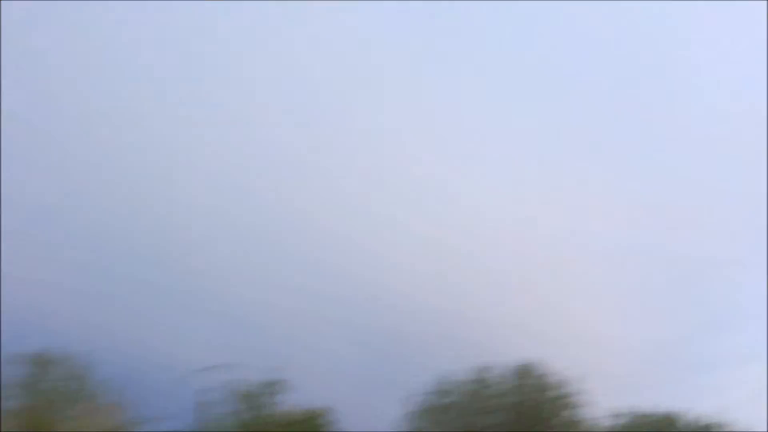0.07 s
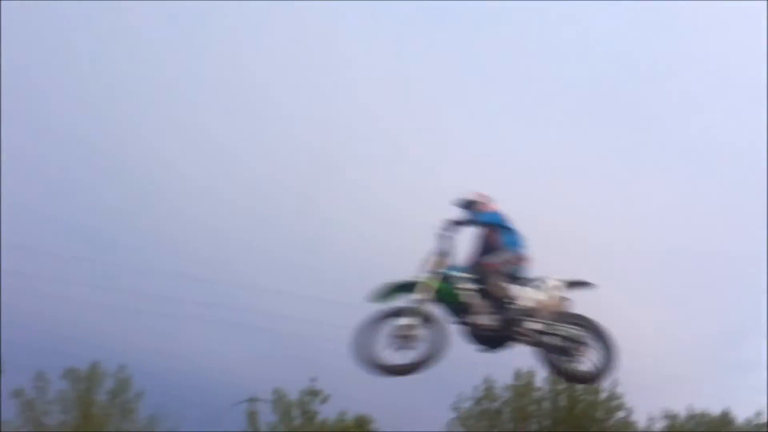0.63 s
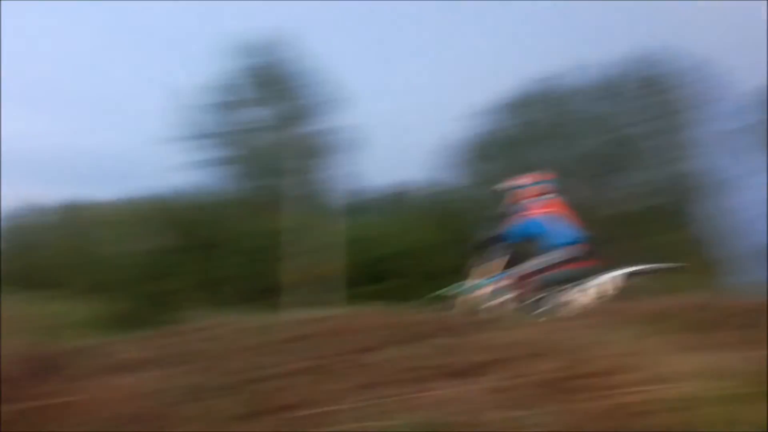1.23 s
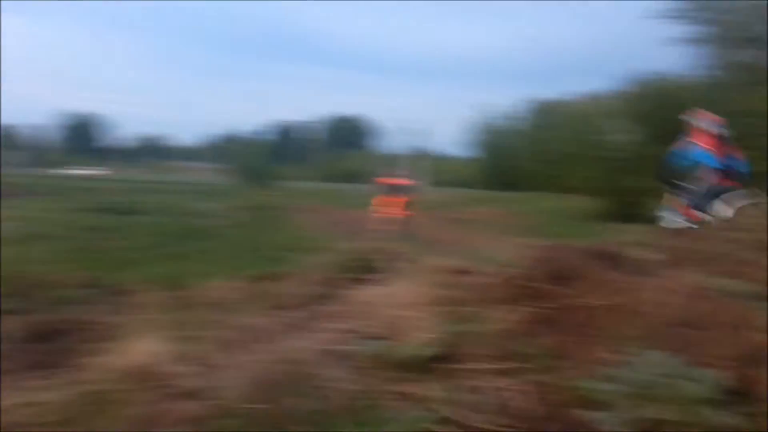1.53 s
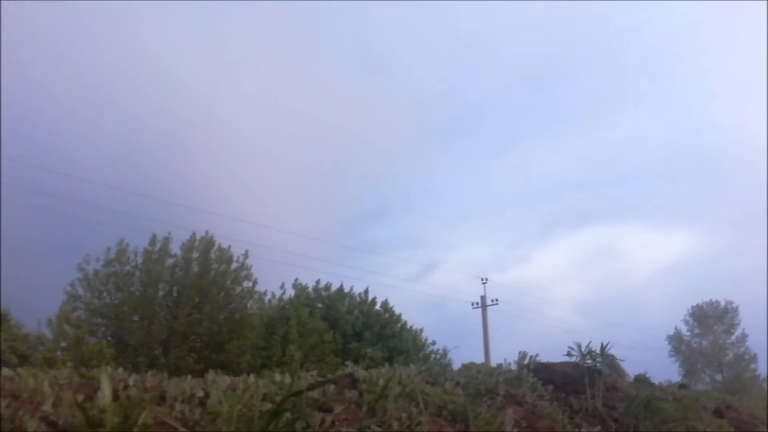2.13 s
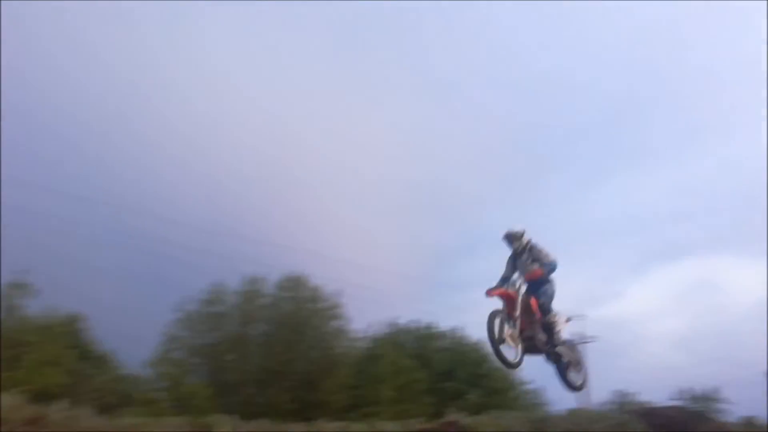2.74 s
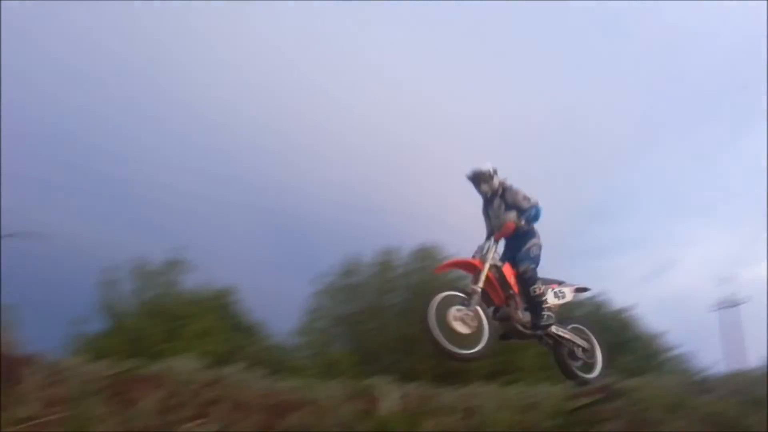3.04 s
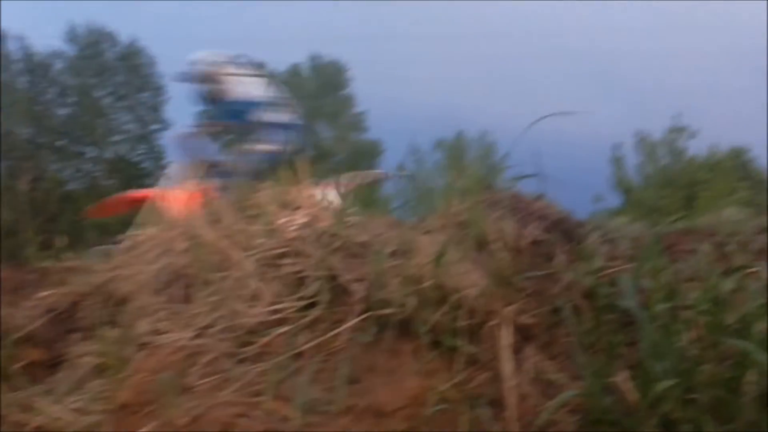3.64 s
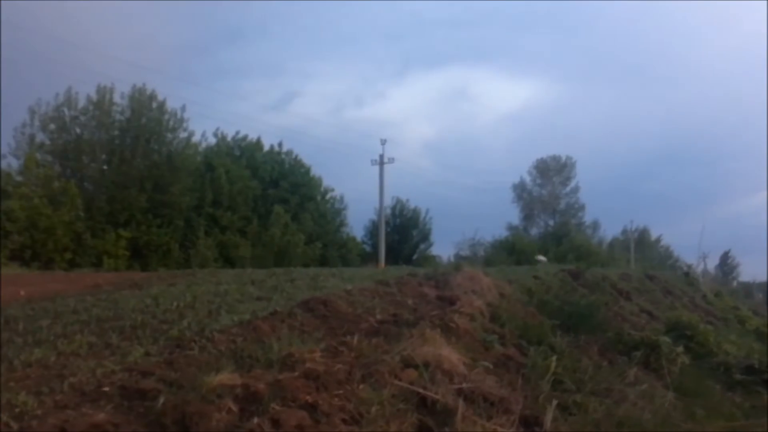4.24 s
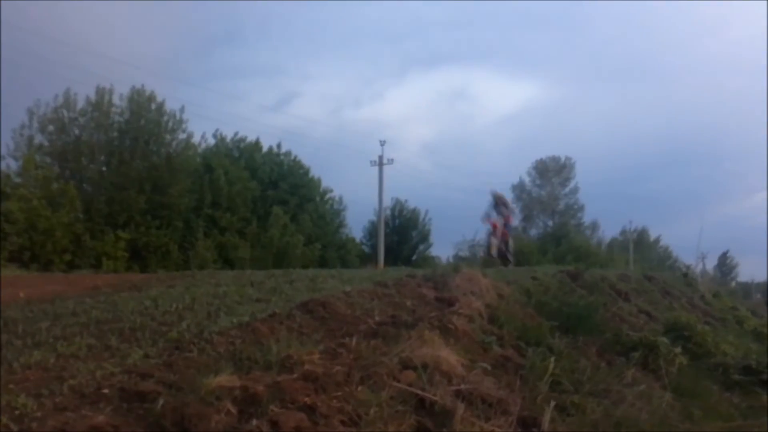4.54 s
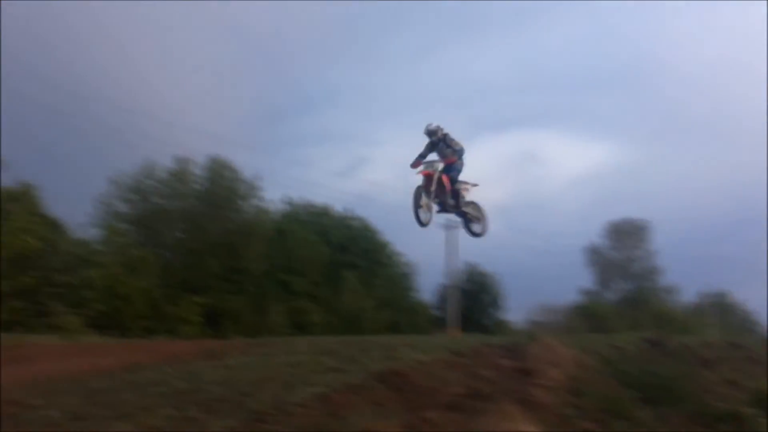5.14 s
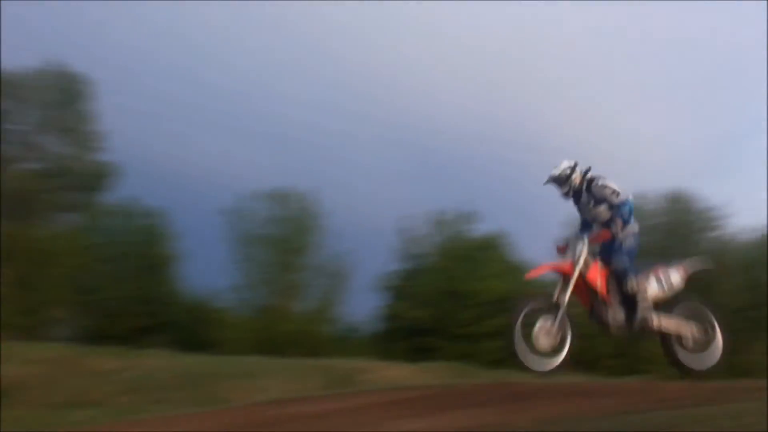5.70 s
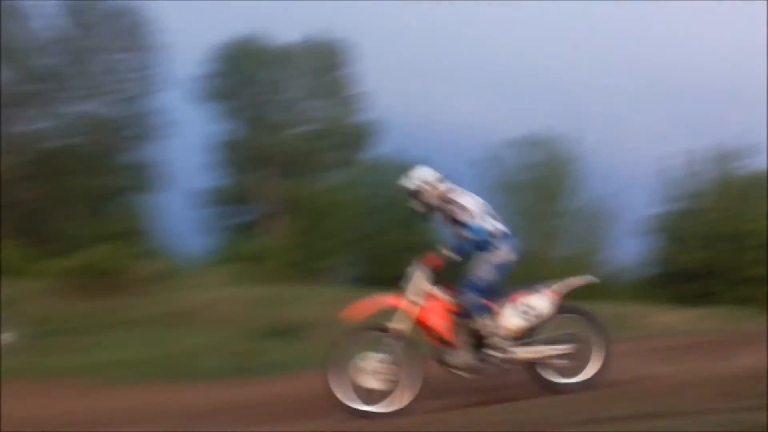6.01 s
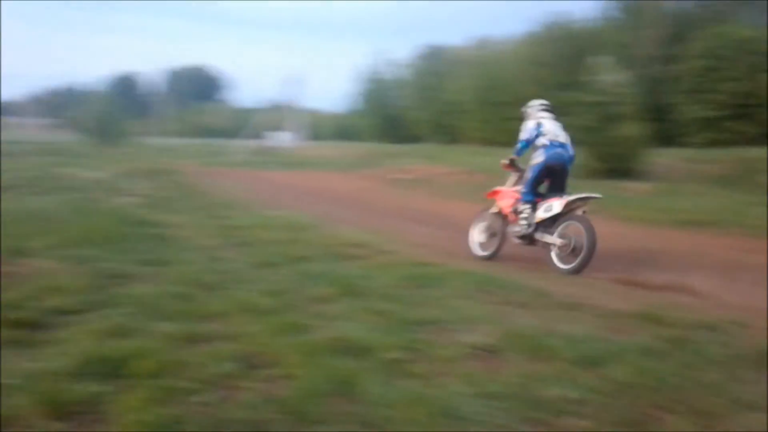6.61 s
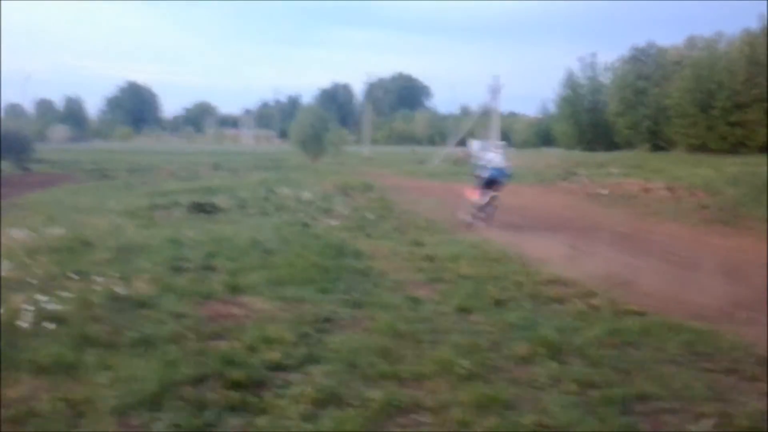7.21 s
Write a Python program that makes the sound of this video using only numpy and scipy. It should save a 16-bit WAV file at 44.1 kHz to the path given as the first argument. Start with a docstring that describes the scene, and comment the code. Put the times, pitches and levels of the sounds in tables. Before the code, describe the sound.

Four-stroke dirt bikes pass close to a stereo microphone outdoors, putting off the throttle and roaring with a rasp on it, over a light wind rumble. The first is close almost at once and fires a loud volley of exhaust bangs from about 0.7 to 1.2 seconds. It recedes, with one hard, bright clack near 1.6 seconds. At 1.9 seconds the sound cuts to a second bike, which putts nearer, revs loudly around 3 seconds, bangs at about 3.2 and 3.5 seconds and leaves to the left. Just after 4.1 seconds it cuts to a third bike. This one builds to a close roar at the highest revs between 5 and 5.7 seconds, then drops in pitch and bangs near 5.9 seconds. It pops several times around 6.5 seconds and fades, with faint last pops at about 7.3 seconds.

```python
"""Three four-stroke dirt bikes take a jump in turn, close to a stereo microphone; light wind rumbles.
Each firing thumps, booms in the pipe and rasps: separate putts off the throttle, a roar on it.
The first bike passes with a volley of exhaust bangs and recedes; one hard clack at 1.56 s.
At 1.9 s the sound cuts to the second, which nears, revs, bangs and leaves to the left.
At 4.15 s it cuts to the third, which roars past at the highest revs and fades, popping."""
import sys
import numpy as np
from scipy import signal
from scipy.fft import rfft, irfft
from scipy.io import wavfile
from scipy.ndimage import uniform_filter1d, map_coordinates

SR = 44100
rng = np.random.default_rng(int(sys.argv[2]) if len(sys.argv) > 2 else 0)


def file_out(sig):
    """Save sig as 16-bit WAV at sys.argv[1]."""
    # one column per channel
    cols = np.atleast_2d(sig).T
    # limit, then scale
    lim = np.clip(cols, -1, 1)
    pcm = np.round(lim * 32767).astype(np.int16)
    wavfile.write(sys.argv[1], SR, pcm)


N = 324576
T = np.arange(N) / SR


def gain_of(db):
    """dB to amplitude."""
    return 10 ** (np.asarray(db) / 20)


def read(points, hz):
    """Spectrum table interpolated over log frequency."""
    f, value = np.transpose(points)
    return np.interp(np.log(hz + 1), np.log(f + 1), value)


def follow(rows):
    """Columns of a time table, per sample."""
    s, *columns = np.transpose(rows)
    return [np.interp(T, s, c) for c in columns]


def add(mix, s, sound):
    """Mix a sound in at time s."""
    part = mix[..., round(s * SR):][..., :sound.shape[-1]]
    part += sound[..., :part.shape[-1]]


def butter(order, hz, kind="low"):
    """Butterworth sections."""
    return signal.butter(order, hz, kind, fs=SR, output="sos")


def colour(x, points):
    """Minimum-phase filter of unit energy with the given spectrum."""
    hz = abs(np.fft.fftfreq(4096, 1 / SR))
    log_gain = np.log(gain_of(read(points, hz)))
    taps = np.fft.ifft(np.exp(np.conj(signal.hilbert(log_gain)))).real
    taps = taps / np.linalg.norm(taps)
    return signal.oaconvolve(x, taps.reshape((1,) * (x.ndim - 1) + (-1,)), axes=-1)[..., :x.shape[-1]]


def steady(x):
    """Hold power at 1 over a few engine cycles."""
    power = np.mean(np.atleast_2d(x) ** 2, axis=0)
    smoothed = uniform_filter1d(uniform_filter1d(power, size=3500), size=3500)
    return x / np.sqrt(abs(smoothed) + 1e-12)


def noise_pair():
    """White noise at two microphone ports, less alike in the treble."""
    # left-right likeness: (frequency [Hz], correlation [0-1])
    likeness = [(300, .6), (1200, .83), (2200, .62), (4500, .82), (6500, .68), (9000, .38), (14000, .15)]
    a, b = rfft(rng.standard_normal((2, N)))
    same = np.clip(read(likeness, np.fft.rfftfreq(N, 1 / SR)), 0, 1)
    return irfft(np.array([a, same * a + np.sqrt(1 - same ** 2) * b]), N)


def puff(clicks, rise_s, fall_s):
    """Rise-and-decay envelope per click; peak 1 for a unit click."""
    t = np.arange(SR // 10) / SR
    shape = (1 - np.exp(-t / rise_s)) ** 2 * np.exp(-t / fall_s)
    return signal.oaconvolve(clicks, shape / shape.max())[:N]


def ports(x):
    """The two microphone ports differ in arrival time, colour and phase."""
    # second bike leaving to the left: (time [s], left lead [ms])
    bearing = [(3.35, 0.049), (3.85, 0.33), (4.1, 0.38), (4.7, 0.14), (5.4, 0.15), (5.7, 0.0082)]
    # left minus right: (frequency [Hz], level [dB])
    imbalance = [(100, 0), (400, 2), (700, -4.5), (1000, -3), (1400, 1.5), (1900, 10.5), (2700, -0.5),
                 (4000, 8), (6500, 1), (10000, -11.5), (15000, -4)]
    # left minus right: (frequency [Hz], phase [rad])
    phase = [(30, -.03), (85, -.1), (170, -.34), (350, -.95), (600, -1.4), (1030, -.8), (1800, -1.1),
             (2700, -2.8), (4000, -3.4), (4650, -6.1), (15000, -6.3)]
    lead_samples = follow(bearing)[0] * SR / 1000
    at, hz = np.arange(N), np.fft.rfftfreq(N, 1 / SR)
    pair = np.array([map_coordinates(side, [at + sign * lead_samples / 2], order=3, mode="nearest")
                     for side, sign in zip(x, (1, -1))])
    lean, turn = gain_of(read(imbalance, hz)), np.exp(1j * read(phase, hz))
    response = np.array([lean * turn, np.ones_like(lean)]) * np.sqrt(2 / (1 + lean ** 2))
    return irfft(rfft(pair) * response, N)


def outdoors():
    """Far wash of the track and low, gusty wind."""
    # track wash: (frequency [Hz], level [dB])
    wash_spectrum = [(30, -42), (100, 7.5), (250, 7.5), (600, -12), (1500, -22.5), (6000, -19),
                     (15000, -39.5)]
    # wind rumble: (frequency [Hz], level [dB])
    wind_spectrum = [(15, -54), (40, 5), (90, 3), (200, -2), (500, -25), (2000, -70)]
    gusts = steady(sum(np.sin(2 * np.pi * (hz * T + rng.random())) for hz in np.geomspace(.4, 6, 20)))
    wind = colour(rng.standard_normal(N), wind_spectrum) * gain_of(2 * gusts)
    return gain_of(-42) * colour(noise_pair(), wash_spectrum) + gain_of(-41.5) * wind


def clack(at_s=1.5585):
    """One hard, bright clack from the bike behind the mound."""
    # clack: (frequency [Hz], level [dB])
    spectrum = [(150, -8), (320, -11), (620, -17), (1040, -19), (1470, -13.5), (2400, -19), (3500, -7),
                (4120, -2.5), (4690, -13), (5350, -8), (7200, -28), (15000, -26)]
    click = np.zeros(N)
    add(click, at_s, np.ones(1))
    shape = puff(click, rise_s=0.0005, fall_s=0.0011) + 0.053 * puff(click, rise_s=0.0017, fall_s=0.01)
    return gain_of(-2) * colour(noise_pair() * shape, spectrum)


def bangs(hollow_hz=352, hollow_decay_s=0.0063):
    """Unburnt fuel fires in the pipe: crackling burst, pressure kick, hollow ring. The row at 0.83 s is a chain
    rattle on landing, voiced the same way."""
    # exhaust bangs, plus a chain rattle on landing at 0.83 s: (time [s], level [dB], extra treble [dB])
    events = [(0.651, -10.5, 1), (0.679, 1, 1), (.685, -2, 2.5), (0.718, 5, -0.5), (0.746, -5, -10),
              (0.771, -4.5, 0), (0.83, -10.5, 7.5), (.971, -1, -5.5), (.999, -2.5, -10), (1.025, -1, 3),
              (1.051, -4, 6), (1.077, -7.5, 4.5), (1.102, -5.5, 4), (1.125, -12.5, -4), (1.223, -9, -4.5),
              (1.395, -17, -10), (1.438, -13.5, -3), (1.482, -25, 5), (1.776, -29, -8), (1.858, -32, 10),
              (1.884, -33, -6), (2.728, -15.5, -4), (3.189, -12, 6), (3.214, -11, -8), (3.534, -14.5, 11),
              (3.56, -11.5, 4), (4.056, -35.5, 7), (4.117, -29, 0), (5.882, -9, -2), (5.928, -3.5, -6.5),
              (6.467, -8, -18), (6.509, -16, -4), (6.53, -6.5, -6), (6.551, -11, -11), (6.572, -12.5, -7),
              (6.593, -12, -7), (7.251, -26, -12), (7.276, -25, -13), (7.3, -25, -9), (7.324, -22, -12),
              (7.349, -24, -7)]
    # burst: (frequency [Hz], level [dB])
    spectrum = [(400, -9), (620, -32), (800, -15), (1100, 8), (1550, -1.5), (2100, 1), (2800, -4.5),
                (3700, -6.5), (5000, -3.5), (6500, -5.5), (9000, -12), (12000, -12.5), (14500, -22)]
    clicks, bright = np.zeros((2, N))
    for s, db, treble_db in events:
        add(clicks, s, gain_of([db]))
        add(bright, s, gain_of([db + treble_db]))
    noise = colour(noise_pair(), spectrum)
    low = signal.sosfiltfilt(butter(2, 2600), noise)
    burst = low * puff(clicks, rise_s=0.00046, fall_s=0.0034)
    burst += (noise - low) * puff(bright, rise_s=0.0011, fall_s=0.0025)
    t = np.arange(SR // 20) / SR
    ring = np.sin(2 * np.pi * hollow_hz * t) * np.exp(-t / hollow_decay_s)
    hollow = signal.oaconvolve(clicks, ring)[:N]
    return gain_of(-5.5) * burst + gain_of(-11.5) * bark(clicks) + gain_of(-22) * hollow


def rebound(x, length_s=0.016):
    """Pressure fronts bounce along the pipe, in the same pattern every cycle."""
    t = np.arange(round(length_s * SR)) / SR
    taps = rng.standard_normal(len(t)) * np.exp(-t / .04)
    spectrum = rfft(taps, 2 * len(t))
    taps = irfft(spectrum / (abs(spectrum) + 1e-9))[:len(t)]  # time smear, near-flat spectrum
    return signal.oaconvolve(x, taps / np.linalg.norm(taps))[:N]


def ringing(clicks):
    """Firings and rushing gas ring the engine's metal as a bike nears."""
    # resonances: (start [s], peak [s], end [s], centre [Hz], width [Hz], level [dB])
    rings = [(2.002, 2.46, 3.2, 1600, 910, -44.5), (2.072, 2.6, 2.8, 4490, 450, -43.5),
             (2.7, 2.95, 3.65, 1450, 600, -33.5), (2.7, 2.95, 2.6, 6000, 2200, -31),
             (4.553, 4.94, 5.2, 1500, 110, -26), (5.1, 5.35, 5.8, 1560, 130, -30),
             (4.49, 4.99, 5, 3411, 555.6, -30.5), (5.06, 5.12, 5.1, 2190, 2000, -21.5)]
    drive = noise_pair() + 0.81 * rebound(steady(clicks))
    out = np.zeros((2, N))
    for start_s, peak_s, end_s, hz, width_hz, db in rings:
        ring = signal.sosfilt(butter(2, [hz - width_hz / 2, hz + width_hz / 2], "band"), drive)
        out += gain_of(db) * np.interp(T, [start_s, peak_s, end_s], [0, 1, 0]) * steady(ring)
    return out


def jet(clicks, rate_hz, flow, opened):
    """Turbulent gas: a sharp front and a puff per firing over a continuous flow."""
    speed = rate_hz / 60
    flow = np.clip(flow, .01, 1) ** .6
    flow = flow ** (np.clip(.75 / speed, 0, 1) ** 2)  # gaps fill at high revs
    sizes = clicks * gain_of(2.6 / speed * np.clip(rng.standard_normal(N), -2, 2))
    puffs = steady(puff(sizes, rise_s=0.0002, fall_s=0.0036))
    # lone fronts crack at low revs; even, bouncing fronts turn the rasp pitched at high revs
    crack = 4 * (1 - flow) ** 2 * np.clip(0.76 / speed, 0, 1) ** 3 * steady(sizes)
    snarl = 1.4 * (.5 + .5 * opened) * speed ** 2 * rebound(steady(clicks))
    front = signal.sosfilt(butter(4, 2200), crack + snarl)
    return noise_pair() * (flow + (1 - flow) * puffs) + front


def silencer(gas, rasp_db, hiss_db, split_hz=3000):
    """The gas jet rings the silencer: rasp below the split, hiss above."""
    # metal modes: (centre [Hz], width [Hz], level [dB])
    modes = [(787, 17, -6), (1039, 18, -2), (1503, 100, -8.5), (3400, 1140, -5), (6200, 2300, -1.5)]
    # gas noise of bikes 1, 2 and 3 (front, rear): (frequency [Hz], level [dB])
    first = [(400, 5.5), (620, -3), (800, 3), (1100, 4), (1550, 2.5), (2100, 3), (2800, -6), (3700, -5.5),
             (5000, -7), (6500, -14.5), (9000, -14.5), (12000, -17.5), (14500, -23.5)]
    second = [(400, 0), (620, -7.5), (800, -3), (1100, -2.5), (1550, -6), (2100, -3), (2800, -6.5),
              (3700, -5), (5000, -4), (6500, -8.5), (9000, -9.5), (12000, -13), (14500, -17)]
    third_front = [(400, 1), (620, -1), (800, 2.5), (1100, 3), (1550, 4), (2100, 1.5), (2800, -4.5),
                   (3700, -3), (5000, -6), (6500, -7.5), (9000, -9), (12000, -12.5), (14500, -20)]
    third_rear = [(400, 9.5), (620, -7), (800, -0.5), (1100, 4.5), (1550, 5), (2100, 1.5), (2800, -12),
                  (3700, -5.5), (5000, -10.5), (6500, -18), (9000, -17), (12000, -22.5), (14500, -25)]
    gas = gas + sum(gain_of(db) * signal.lfilter(*signal.iirpeak(hz, hz / width_hz, fs=SR), gas)
                    for hz, width_hz, db in modes)
    sound = colour(gas, first)
    for s, spectrum in [(1.905, second), (4.145, third_front), (5.755, third_rear)]:
        sound[:, round(s * SR):] = colour(gas, spectrum)[:, round(s * SR):]
    low = signal.sosfiltfilt(butter(2, split_hz), sound)
    rasp = signal.sosfilt(butter(4, 340, "high"), low)
    return gain_of(rasp_db) * steady(rasp) + gain_of(hiss_db) * steady(sound - low)


def bark(clicks, front_s=0.00091, swing_s=0.00072):
    """Pressure wave of a firing: dip, steep front, short crest."""
    t = np.arange(-SR // 100, SR // 100) / SR
    shape = np.tanh(t / front_s) * np.exp(-abs(t) / swing_s)
    return signal.oaconvolve(clicks, shape / shape.max(), "same")


def boom(pulses, note_hz):
    """Each pulse swings the pipe a couple of times and leaves an after-ring."""
    lead_swings, peak_swings, tail_swings = 0.83, 0.84, 4.7
    out, t = np.zeros(N), np.arange(SR // 16) / SR
    at = np.flatnonzero(pulses)
    for i, scatter in zip(at, 0.06 * rng.standard_normal(len(at))):
        hz = note_hz[i] * (1 + scatter)
        swings = hz * t
        rise = swings / peak_swings
        swell = (rise * np.exp(1 - rise)) ** 2
        tail = gain_of(-3) * np.tanh(rise) ** 2 * np.exp(-swings / tail_swings)
        angle = 2 * np.pi * (swings - lead_swings)
        modes = np.sin(angle) + gain_of(-16) * np.sin(1.926 * angle)
        add(out, max(i / SR - lead_swings / hz, 0), pulses[i] * (swell + tail) * modes)
    return out


def thump(pulses, lead_s=0.0025):
    """Muffled pressure pulse, starting just ahead of the front."""
    # pulse: (frequency [Hz], level [dB])
    spectrum = [(15, -21.5), (35, 2), (60, 6), (95, 13.5), (140, 6), (250, -6.5), (600, -45.5),
                (2000, -102)]
    return colour(-np.roll(pulses, -round(lead_s * SR)), spectrum)


def strokes(cycles, uneven_db):
    """One click per engine cycle, of random strength."""
    at = np.flatnonzero(np.diff(np.floor(cycles)) > 0)
    clicks = np.zeros(N)
    clicks[at] = gain_of(uneven_db * np.clip(rng.standard_normal(len(at)), -2, 2))
    return clicks


def throttle(ramp_s=0.045, decay_s=0.064, coasting_flow=0.63):
    """Each twist ramps open, holds and decays; gives four level offsets, gas flow and opening."""
    # twists: (open [s], shut [s], thump [dB], boom [dB], bark [dB], gas [dB], flow between firings [0-1])
    twists = [(0.615, 0.752, -1, -2, 3, 13.5, 0.43), (0.97, 1.076, 11, 9, -2, 15, 0.47),
              (1.11, 1.464, 1.5, -5.5, 16.5, 10.5, 0.33), (1.69, 1.863, -6, -2.5, 13.5, 0, 0.29),
              (2.567, 2.84, -5, -8, 1, 4.5, 0.48), (2.854, 3.04, 7, -2, -2, 3, 0.72),
              (3.144, 3.186, -3, -14, 12, 1.5, 0.7), (3.388, 3.621, -0.5, 0, 12.5, 7.5, 0.22),
              (4.134, 4.346, 5, -6.5, 13.5, 2.5, 1), (4.605, 4.981, 7, -9, 13, 15.5, 0.47),
              (4.852, 5.002, 5.5, 6.5, -7, -2.5, 0.9), (5.472, 5.741, 8.5, -6, 8, 9, 0.4),
              (5.82, 7.101, 1.5, -6.5, 5.5, 5, 0.56), (5.84, 6.042, 1.5, -3, 5, 5.5, 0.38),
              (6.411, 6.595, 5, 7.5, 13.5, 8.5, 0.27), (7.142, 7.36, -29, 3, 15, 11.5, 0.16)]
    added_db, flow, opened = np.zeros((4, N)), np.full(N, coasting_flow), np.zeros(N)
    for open_s, shut_s, *layers_db, share in twists:
        grip = np.clip((T - open_s) / ramp_s, 0, 1) * np.exp(-np.maximum(T - shut_s, 0) / decay_s)
        added_db += np.outer(layers_db, grip)
        flow += grip * (share - flow)
        opened = np.maximum(opened, grip)
    return *added_db, flow, opened


def engines(cruise_hz=40):
    """One cylinder per bike; throttle, nearness and revs set the exhaust levels."""
    # engine speed per bike: (time [s], firing rate [Hz])
    revs_1 = [(0.0, 44.99), (0.103, 31.53), (0.218, 38.27), (0.374, 38.9), (0.59, 34.94), (0.653, 29.32),
              (0.719, 32.33), (0.772, 41.65), (0.82, 43.71), (0.901, 54.08), (0.945, 36.71), (1.001, 36.17),
              (1.15, 43.79), (1.199, 39.36), (1.332, 49.81), (1.617, 35.27), (1.777, 38.67)]
    revs_2 = [(1.947, 32.03), (2.003, 38.66), (2.121, 29.0), (2.369, 35.63), (2.599, 33.66), (2.73, 27.91),
              (2.788, 40.45), (2.949, 58.94), (3.015, 62.34), (3.082, 58.08), (3.126, 29.39), (3.19, 35.94),
              (3.243, 35.81), (3.371, 28.17), (3.429, 38.39), (3.536, 37.12), (3.627, 50.55), (3.67, 43.43),
              (3.757, 48.34), (3.854, 34.2), (3.91, 37.25), (4.027, 31.93), (4.087, 32.13)]
    revs_3 = [(4.188, 47.6), (4.313, 48.75), (4.404, 38.8), (4.455, 39.55), (4.51, 33.2), (4.672, 41.23),
              (4.794, 56.55), (4.864, 58.02), (4.927, 69.29), (5.009, 77.7), (5.036, 67.31), (5.063, 76.69),
              (5.455, 56.2), (5.486, 69.11), (5.518, 59.77), (5.605, 78.16), (5.679, 84.94), (5.727, 81.18),
              (5.755, 55.84), (5.797, 46.55), (5.884, 43.65), (5.929, 45.19), (6.007, 57.49),
              (6.145, 57.81), (6.184, 46.96), (6.224, 51.27), (6.31, 42.37), (6.654, 50.64), (6.696, 45.94),
              (6.954, 46.8), (7.041, 44.6), (7.085, 49.5), (7.128, 38.54), (7.179, 43.28), (7.227, 39.77),
              (7.36, 41.49)]
    # far opening, then each pass: (time [s], nearness [dB], pipe note [Hz], extra treble [dB])
    far = [(0, -12.5, 101.7, -4), (.134, -15, 109, 1)]
    pass_1 = [(0.141, 4, 173, -0.5), (0.45, 1.5, 177, -1), (0.483, 5.5, 128, -7), (.58, 3.5, 128, -4),
              (0.681, 3, 164, -1.5), (.92, 4, 135, -0.5), (1.042, -5.5, 239, 6), (1.35, -15.5, 185.8, 8),
              (1.602, -14.5, 140, 6.5), (1.902, -16, 122, 18.5)]
    pass_2 = [(1.92, -9.5, 133, -4.5), (2.2, -8.5, 117.6, -6), (2.659, -6.5, 103, 3.5),
              (2.718, 7.5, 158, -0.5), (3.1, 7.5, 137.3, -7), (3.38, 3, 133.2, -1.5), (3.5, 2, 243, -0.5),
              (3.68, 1.5, 266, -5.5), (3.85, -4.5, 195, -3), (4.01, -8.5, 189, -4), (4.13, -7, 125.2, -13)]
    pass_3 = [(4.16, -13.5, 142, -36), (4.35, -13.5, 132.2, -7), (4.43, -9.5, 129, -6.5),
              (4.58, -3.5, 123.2, -1), (4.8, -9, 111, -2.5), (5.05, 7.5, 158, -9), (5.46, 9, 113, -8.5),
              (5.7, 0, 171.6, 0), (5.798, 3.5, 149, -3), (6.1, 0.5, 176.6, -0.5), (6.5, -8, 247, 2),
              (7.13, -12.5, 235, 2.5), (7.16, -15, 131, 0)]
    rate_hz = follow(revs_1 + revs_2 + revs_3)[0]
    near_db, note_hz, treble_db = follow(far + pass_1 + pass_2 + pass_3)
    octaves = np.log2(rate_hz / cruise_hz)

    thump_db, boom_db, bark_db, gas_db, flow, opened = throttle()
    thump_db += -27 + 0.76 * near_db - 7.5 * octaves
    boom_db += -22.5 + 0.55 * near_db - 7.5 * octaves
    bark_db += -36.5 + 1.53 * near_db + 0.85 * octaves
    rasp_db = -37.5 + near_db + 6.46 * octaves + gas_db
    hiss_db = -33 + 1.37 * near_db + 8.87 * octaves + 0.65 * gas_db + treble_db

    cycles = np.cumsum(rate_hz) / SR
    clicks = strokes(cycles, uneven_db=1.93) ** ((cruise_hz / rate_hz) ** 2)  # more even when fast
    # coasting at high revs, the crank's other turn pumps a pulse too
    pumping = 0.36 * (1 - opened) * np.interp(rate_hz, [46, 62], [0, 1])
    pulses = clicks + pumping * strokes(cycles - .5, uneven_db=8)
    return (gain_of(thump_db) * steady(thump(pulses))
            + gain_of(boom_db) * steady(boom(pulses, note_hz))
            + gain_of(bark_db) * steady(bark(pulses))
            + silencer(jet(clicks, rate_hz, flow, opened), rasp_db, hiss_db)
            + ringing(clicks))


def scene():
    """Bikes and their bangs in an open field."""
    return ports(engines() + bangs() + clack()) + outdoors()


def record(dry):
    """The loudest bangs clip; low-pass at 15.9 kHz."""
    lowpass = signal.firwin(511, 15900, window=("kaiser", 9), fs=SR)
    return signal.oaconvolve(np.clip(dry, -1, 1), lowpass[None], "same")


dry = scene()
out = record(dry)
file_out(out)
```